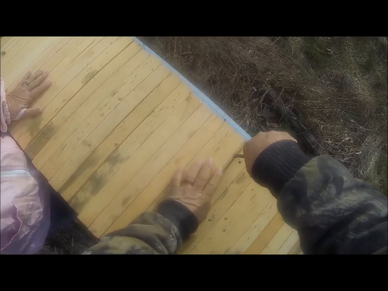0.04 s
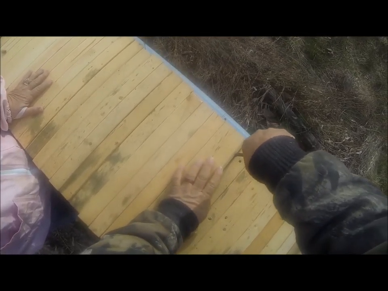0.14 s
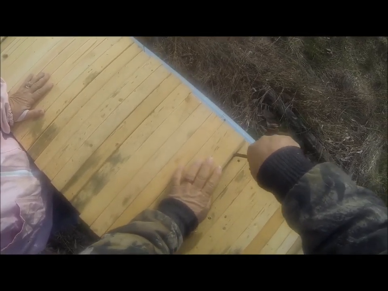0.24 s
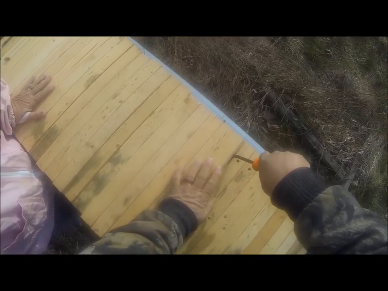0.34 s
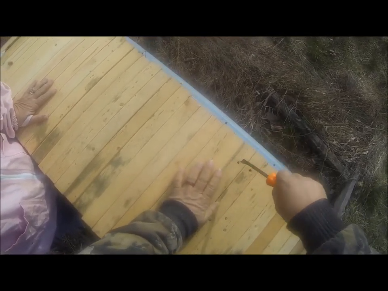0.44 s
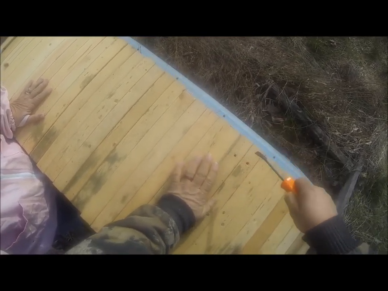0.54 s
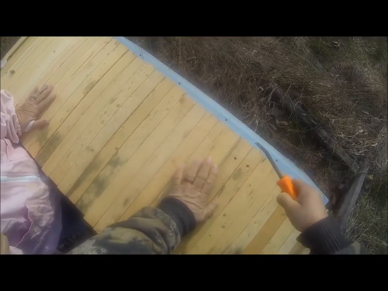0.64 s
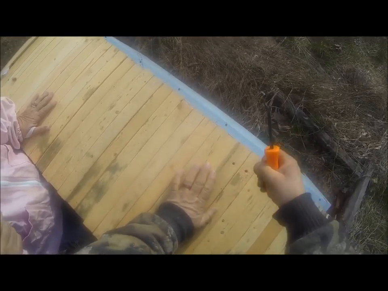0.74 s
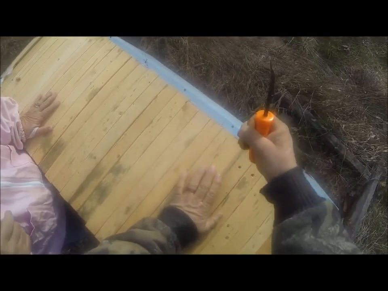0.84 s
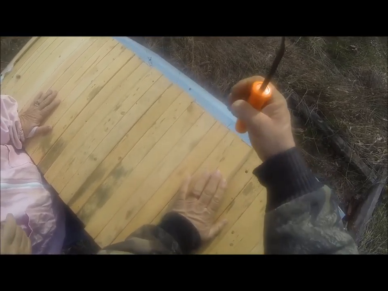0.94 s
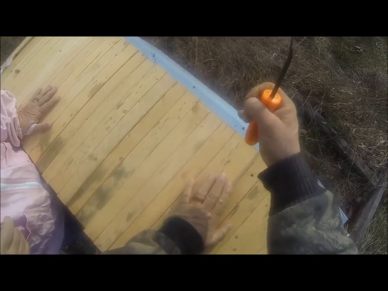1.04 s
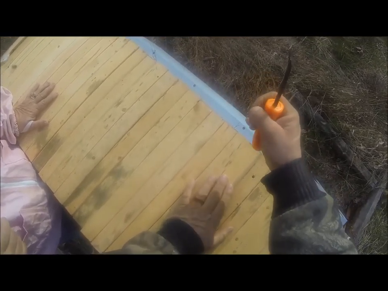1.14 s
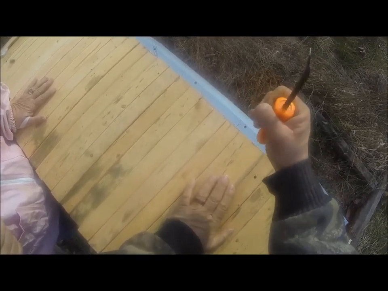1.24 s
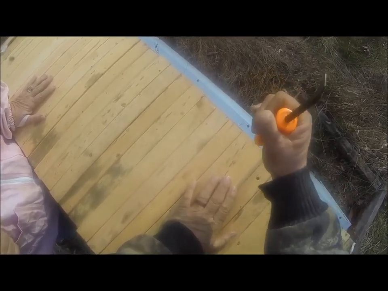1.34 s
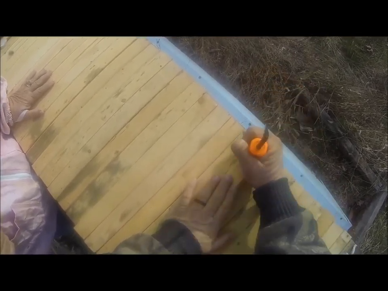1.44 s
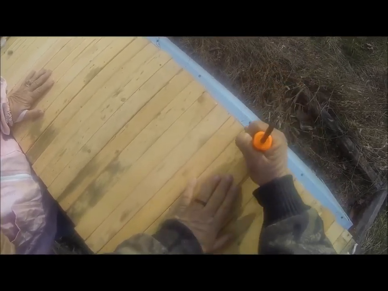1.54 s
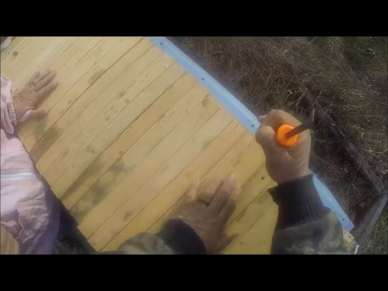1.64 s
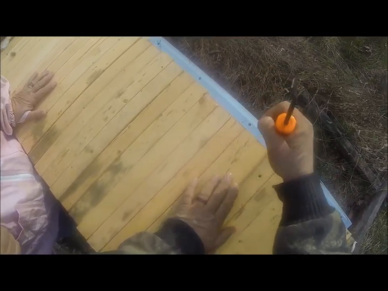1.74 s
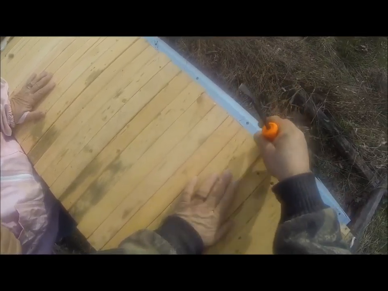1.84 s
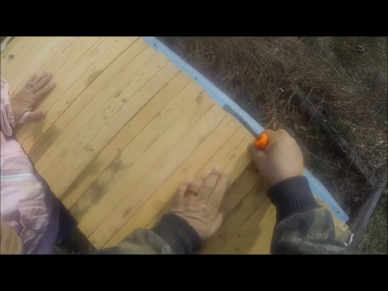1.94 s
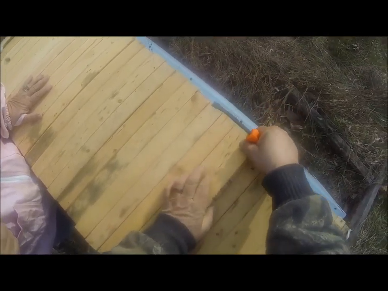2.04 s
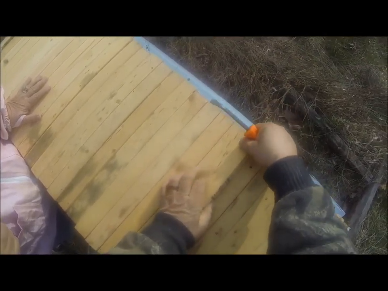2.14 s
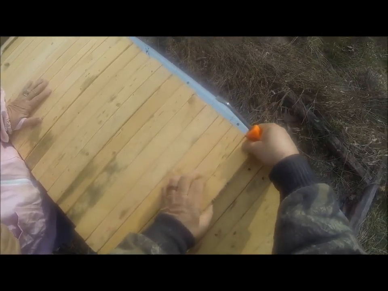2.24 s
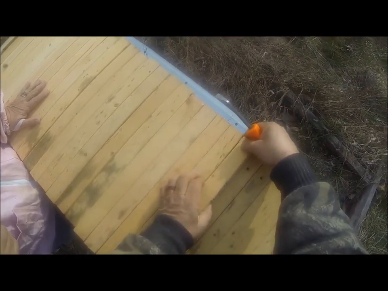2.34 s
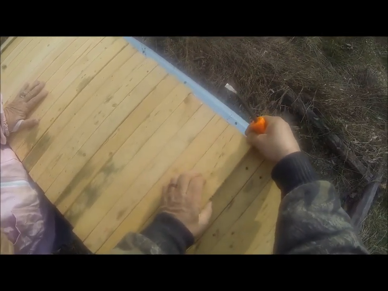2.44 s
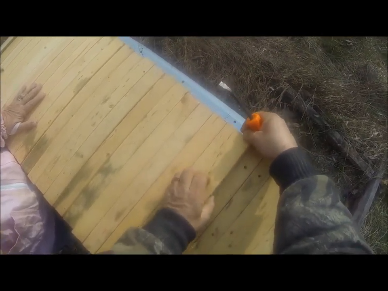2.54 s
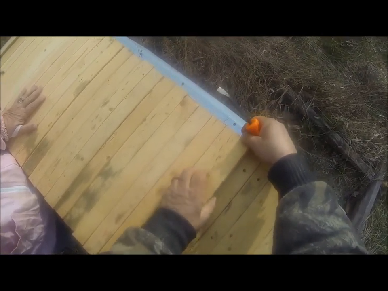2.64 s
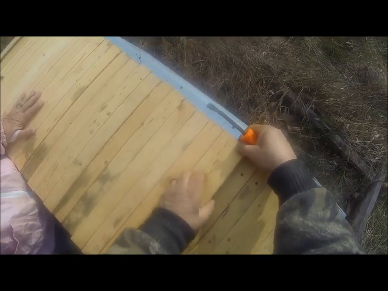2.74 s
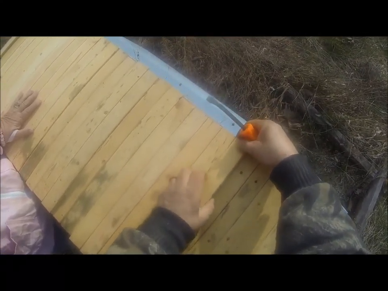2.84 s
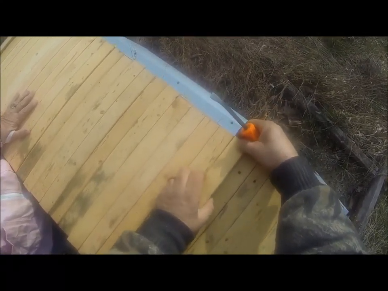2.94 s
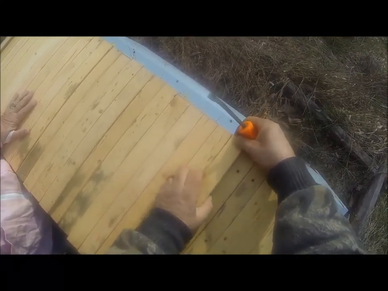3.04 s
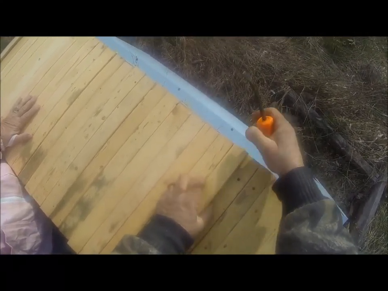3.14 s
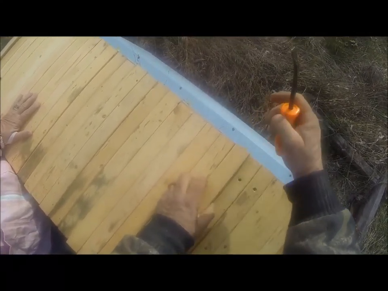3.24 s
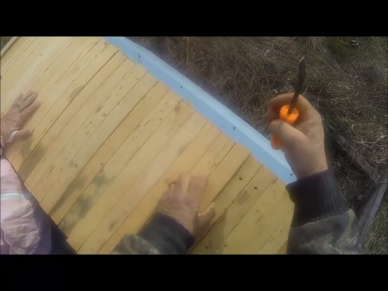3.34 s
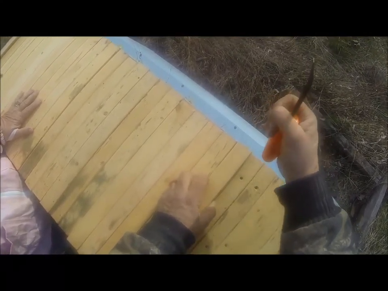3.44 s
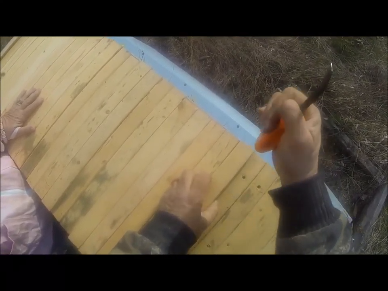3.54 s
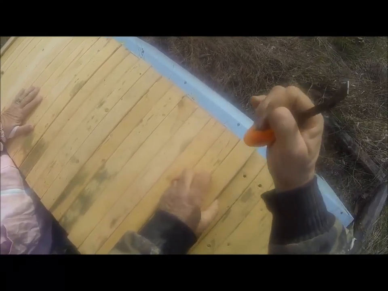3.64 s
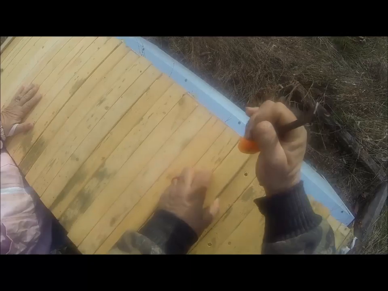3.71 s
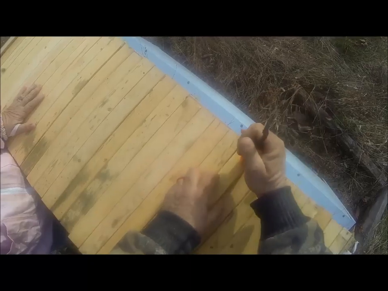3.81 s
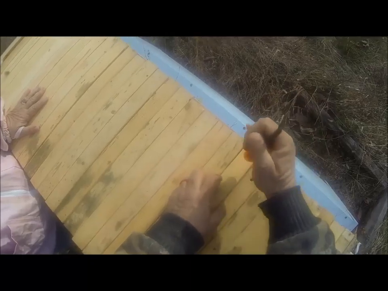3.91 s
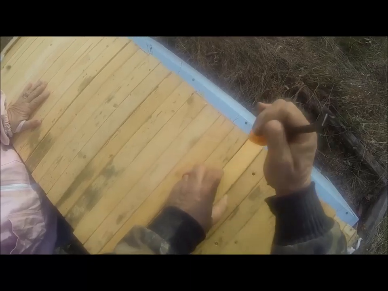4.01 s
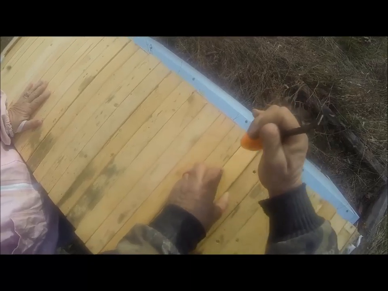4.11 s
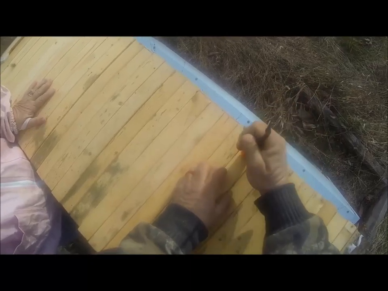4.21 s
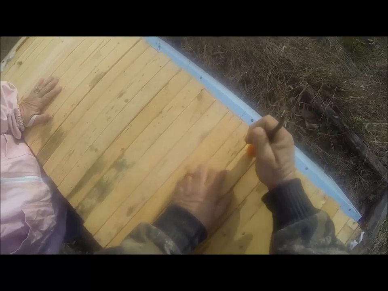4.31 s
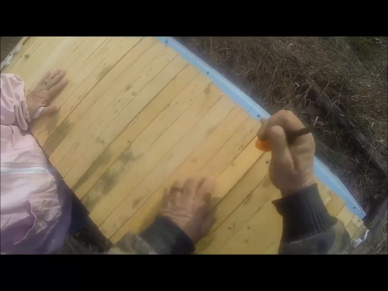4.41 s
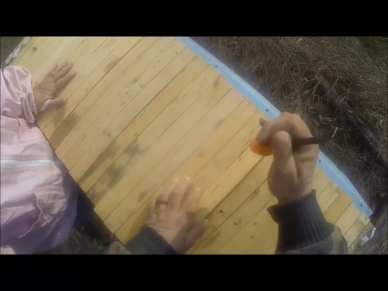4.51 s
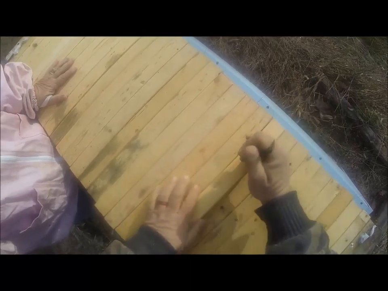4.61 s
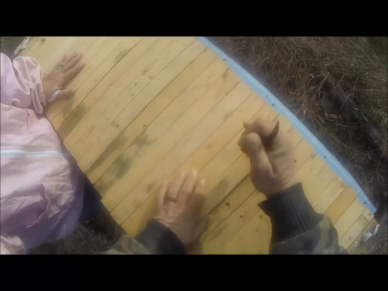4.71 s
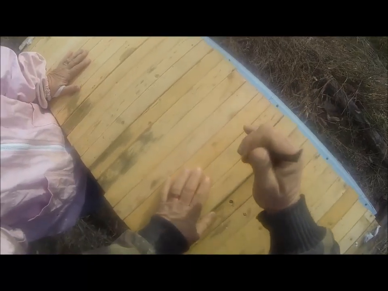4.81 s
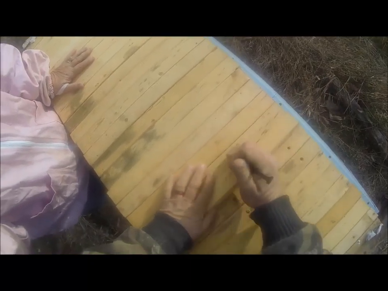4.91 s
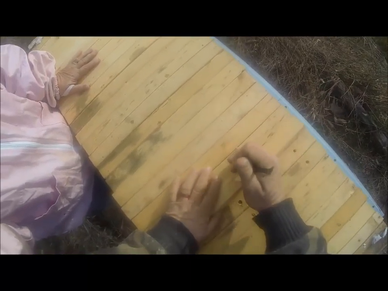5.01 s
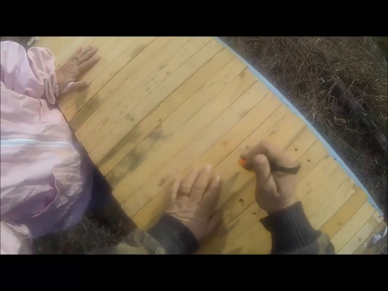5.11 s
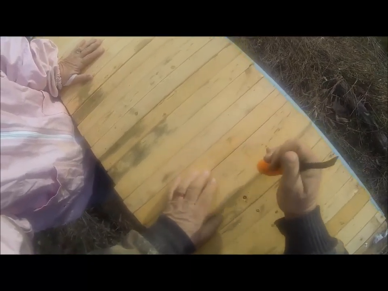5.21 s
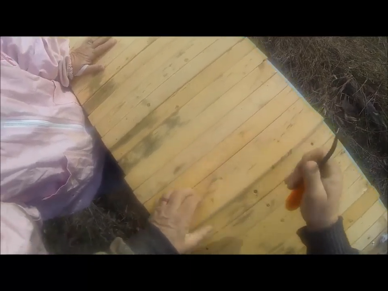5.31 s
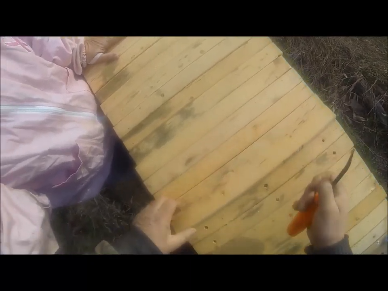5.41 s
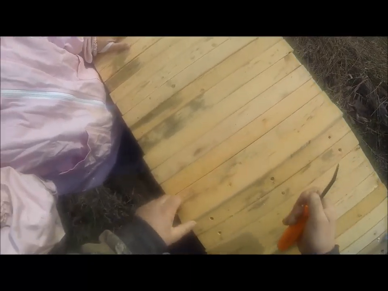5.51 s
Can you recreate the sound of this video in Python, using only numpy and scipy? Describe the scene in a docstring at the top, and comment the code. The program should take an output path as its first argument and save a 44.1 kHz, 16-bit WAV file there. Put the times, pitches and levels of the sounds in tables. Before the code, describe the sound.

Sparse loud woody clacks with sharp edge snaps, speeding up near the end, among small blade scrapes and soft hand bumps outdoors.

```python
"""Hand tool on a slatted deck

A hand tool is set into the gaps of wooden slats outdoors, close to a body-worn camera.
Hard blows sum a swelling clack, an edge snap and ringing modes of slat and deck; rebounds are heavier.
Between them filtered noise scrapes and ticks as the blade, and soft thuds bump and judder the wood.
A jacket rustles over quiet air, far hoots and a thin whine; a limiter ducks all after the loudest peaks."""
import sys
import numpy as np
from scipy import signal
from scipy.io import wavfile
from scipy.ndimage import uniform_filter1d, minimum_filter1d

SR = 44100
rng = np.random.default_rng(int(sys.argv[2]) if len(sys.argv) > 2 else 0)


def put_to_file(sound):
    """Save the sound as 16-bit audio at rate SR, in the file named by the first command-line argument."""
    columns = np.atleast_2d(sound).T  # one column per channel
    safe = np.clip(columns, -1, 1)
    whole_steps = np.round(safe * 32767)
    wavfile.write(sys.argv[1], SR, whole_steps.astype(np.int16))


N = 245195

# Colour of the outdoor air. Each row: frequency in Hz, relative density in dB per Hz.
AIR_COLOUR = [(20, -2.5), (50, 5), (105, -3.5), (130, -3), (165, -8.5), (280, -15), (700, -18), (1500, -26),
              (3800, -33.5), (7500, -34.5), (10200, -39), (12000, -39), (14000, -41.5), (15500, -54.5)]
# Faint far hoots. Each row: start and end in seconds, first and last pitch in Hz, level in dB.
FAR_HOOTS = [(0.696, 0.824, 799, 594, -61.5), (0.987, 1.082, 584, 648, -66),
             (1.273, 1.347, 570, 680, -65.5)]
# The jacket rustles as the arm works. Each row: start and end in seconds, level in dB.
ARM_MOVES = [(.6, 1.12, -75), (1.999, 3.301, -75), (3.813, 5.361, -62.5)]
# Colour of the cloth. Each row: frequency in Hz, relative density in dB per Hz.
CLOTH_COLOUR = [(60, -0.5), (200, 3), (450, -3.5), (900, -2), (1400, 0.5), (1900, -6), (2500, -14),
                (4000, -22), (8000, -24.5), (15000, -33.5)]
# Thin tones under everything. Each row: pitch in Hz, level in dB, waver in Hz, pulsing depth from 0 to 1.
WHINE_TONES = [(124, -68.5, 8, 0), (4940, -91, 70, .8), (5730, -89.5, 79, .9), (7692, -76.5, .3, 0.6),
               (7776, -86.5, 34, 0.8), (10300, -84, 90, .9)]
# Blade and palm sliding on wood. Each row: start and end in seconds, hiss level in dB,
# wood tone in dB against the hiss, relative judder level in dB.
SCRAPE_STROKES = [(.005, 0.043, -67.5, -4, -47.5), (0.434, .49, -63, 9, -28), (2.022, 2.065, -63, -1, -38),
                  (2.05, 2.42, -76, -18, -46), (2.472, 2.565, -63.5, -1, -38),
                  (2.689, 2.73, -77.5, 16, -44), (2.7, 3.3, -72.5, -2, -38), (4.164, 4.225, -69.5, 2, -41),
                  (4.359, 4.56, -63, 2.5, -48), (4.521, 4.68, -57, -5, -45.5),
                  (4.715, 4.785, -53.5, -3, -29.5)]
# The steel blade catching on an edge. Each row: start in seconds, relative level in dB.
BLADE_TICKS = [(.107, -43.5), (.4734, -37.5), (2.309, -41.5), (2.376, -40.5), (2.550, -34), (2.603, -42),
               (3.9946, -29.5), (4.182, -34.5), (4.6362, -32), (4.7051, -25.5), (4.754, -27.5)]
# Colour of the steel blade. Each row: frequency in Hz, relative density in dB per Hz.
STEEL_COLOUR = [(300, -6.5), (1500, 7), (2600, -2), (3400, -1), (4300, -8.5), (5100, 1.5), (6000, -7),
                (7200, 0.5), (8600, -0.5), (10000, -6), (12500, -14), (15500, -18.5)]
# Ring of the tool itself. Each row: mode in Hz, relative level in dB, t60 in seconds.
TOOL_MODES = [(1964, 5.5, 0.056), (2016, -13, 0.056), (3310, -6, 0.081), (3630, -22, 0.03),
              (4830, -11, 0.053), (6200, -7.5, 0.036), (7000, -6, .03), (8200, -9, 0.044),
              (8780, -2, 0.026)]
# Soft bumps of hand and handle. Each row: start in seconds, relative level in dB, brightness in Hz.
HAND_BUMPS = [(.108, -35, 1200), (.345, -34, 200), (0.474, -18.5, 690), (2.289, -24.5, 187),
              (2.309, -40, 800), (2.342, -31, 328), (2.480, -32.5, 500), (2.506, -22, 342),
              (2.5139, -28, 360), (2.549, -32.5, 1400), (2.569, -33, 1200), (2.76, -38.5, 296),
              (3.170, -26, 346), (3.979, -31.5, 400), (4.179, -32.5, 452), (4.752, -23, 320),
              (4.77, -18, 378)]
# Modes of a slat before tuning and damping. Each row: mode in Hz, relative level in dB, t60 in seconds.
SLAT_MODES = [(89, -21, 0.29), (157, -25.5, 0.12), (182.5, -23.5, 0.14), (215.7, -17.5, 0.13),
              (232, -14, 0.072), (330, -28.5, 0.06), (355, -17, 0.071), (387, -18.5, 0.01),
              (492, -16.5, 0.062), (550.4, -28.5, 0.092), (641.2, -23, .065), (687, -11.5, 0.01),
              (860, -16, 0.016), (1021, -17, 0.036), (1110, -26, 0.042), (1216, -17, 0.034),
              (1420.6, -13.5, .02), (1509, -22.5, 0.056), (1800, -31, 0.05), (1913, -17.5, 0.057),
              (2220, -15.5, 0.022), (2314, -22, 0.025), (2500, -38.5, 0.031), (3350, -36.5, .032),
              (3370, -38, 0.015), (3790, -38.5, .022)]
# Dense overtones of the whole deck. Each row: frequency in Hz, relative density in dB per Hz.
DECK_COLOUR = [(60, -17), (160, 13.5), (400, 1.5), (800, -5.5), (1400, -1.5), (2000, -6), (2700, -17.5),
               (4500, -34), (8000, -32.5), (15000, -55.5)]
# Their decay before damping. Each row: frequency in Hz, t60 in seconds.
DECK_DECAY = [(100, 0.084), (400, 0.1), (1500, 0.054), (3500, 0.03), (9000, 0.065)]
# Hard blows of the tool. Each row: start in seconds, force in dB, clack pitch in Hz,
# relative edge level in dB, place along the slat in metres, slat tuning factor.
TOOL_BLOWS = [(1.5077, 11.5, 1345, -6, 0.59, 0.96), (3.838, 11, 1027, -2.5, 0.84, .99),
              (4.2376, 13.5, 947, -5, 1.23, 0.98), (4.6687, 16.5, 1070, -6.5, .52, 1.01),
              (4.971, 12.5, 976, -16, 1.261, 1.01), (5.0036, 9.5, 1100, -23, 0.52, .92)]
# The slat last struck slaps back on its support. Each row: start in seconds, force in dB,
# clack pitch in Hz, relative edge level in dB, place along the slat in metres.
SLAT_REBOUNDS = [(1.5105, 4.5, 1110, -13.5, 0.74), (3.8463, -6, 1080, -10, 1.4), (3.856, 0, 800, -8, 0.6),
                 (4.2443, 3.5, 700, -9, 0.72), (4.3109, -16.5, 826, -33, 0.51),
                 (4.6729, 4.5, 2210, 2.5, 0.74), (4.9767, 4.5, 1435, 7.5, .8)]
# A blow is bright and leaves slat and blade free to ring; a rebound is heavy and damped.
# Each holds: cycles to the clack's peak, slat ring in dB, bass in dB, ring time factor,
# blade ring in dB against the edge snap.
BLOW_CONTACT = (0.76, 0.5, -8, 1.1253, -7.5)
REBOUND_CONTACT = (.65, 2, 10, 0.7142, -20.5)
# Colour of a wooden edge snapping under the blade. Each row: frequency in Hz, relative density in dB per Hz.
SNAP_COLOUR = [(300, -6.5), (1500, -2.5), (2400, 2.5), (3000, 1), (3900, 4), (4700, 0.5), (6000, -5.5),
               (7200, -1.5), (8600, -1.5), (10000, -13.5), (12500, -18), (15500, -33.5)]

AIR_DB = -59.5
MOVE_FADE_S, RESTING_DB = 0.15, -78
WEDGED_S = (1.95, 3.4)  # wedged in a gap, the blade rings as it scrapes; otherwise the fist damps it
JUDDER_HZ = 297.4  # brightness of the thuds as a sliding hand sticks and slips
EDGE_HZ = 15200  # upper band limit
RING_T = np.arange(SR // 4) / SR  # time axis of one ring, in seconds


def amp(db):
    """Turns decibels into gain."""
    return 10 ** (np.asarray(db) / 20)


def unit(x):
    """Scales to rms 1."""
    return x / np.sqrt(np.mean(x ** 2) + 1e-20)


def read(points, hz):
    """Reads a table on a log-frequency axis."""
    f, value = np.transpose(points)
    return np.interp(np.log(hz + 1), np.log(f), value)


def add(mix, s, sound):
    """Mixes a sound in at time s, in seconds."""
    part = mix[max(round(s * SR), 0):][:len(sound)]
    part += sound[:len(part)]


def colour(x, points):
    """Filters causally to the given spectrum, with unit power gain for white noise."""
    log_gain = np.log(amp(read(points, np.fft.rfftfreq(4096, 1 / SR))))
    circle = np.r_[log_gain, log_gain[-2:0:-1]]
    # minimum phase: the response starts at once
    response = np.fft.ifft(np.exp(np.conj(signal.hilbert(circle)))).real
    taps = response[:len(circle) // 2]
    return signal.oaconvolve(x, taps / np.linalg.norm(taps))[:len(x)]


def drift(length, per_s):
    """Wanders at random by straight lines between normal random points, per_s of them a second."""
    knots = rng.standard_normal(int(length / SR * per_s) + 2)
    return np.interp(np.arange(length) / SR * per_s, np.arange(len(knots)), knots)


def decay(t, t60):
    """Exponential decay by 60 dB in t60 seconds."""
    return np.exp(-np.log(1000) * t / t60)


def outdoors(swell_db=-0.37, waver=0.08):
    """Air is slowly swelling noise, low rumble and hiss; far hoots are gliding tones blurred by waver."""
    level_db = AIR_DB + swell_db * drift(N, per_s=4.6)
    out = amp(level_db) * colour(rng.standard_normal(N), AIR_COLOUR)
    for start, end, first_hz, last_hz, db in FAR_HOOTS:
        length = max(round((end - start) * SR), 2)
        glide_hz = np.linspace(first_hz, last_hz, length)
        hz = glide_hz * (1 + waver * drift(length, per_s=530))
        tone = np.sin(2 * np.pi * np.cumsum(hz) / SR)
        add(out, start, amp(db) * signal.windows.tukey(length, .6) * tone)
    return out


def jacket(flutter_db=1.5):
    """Cloth rubs unevenly, swelling and fading with each arm move over a faint resting rustle."""
    t = np.arange(N) / SR
    rub = np.full(N, amp(RESTING_DB))
    for start, end, db in ARM_MOVES:
        fade = np.clip(np.minimum(t - start, end - t) / MOVE_FADE_S, 0, 1)
        rub += amp(db) * fade
    flutter = amp(flutter_db * drift(N, per_s=21))
    return rub * flutter * colour(rng.standard_normal(N), CLOTH_COLOUR)


def whine(gap_share=0.26, frames_per_s=30):
    """A low hum stays steady; thin high tones dip briefly with every frame that the camera takes."""
    gaps = (np.arange(N) * frames_per_s / SR) % 1 < gap_share
    gaps = uniform_filter1d(gaps.astype(float), size=100)
    out = np.zeros(N)
    for hz, db, waver_hz, depth in WHINE_TONES:
        pitch_hz = hz + waver_hz * drift(N, per_s=750)
        tone = np.sin(2 * np.pi * np.cumsum(pitch_hz) / SR)
        out += amp(db) * (1 - depth * gaps) * tone
    return out


def blade(tick_db=-8, tick_wood_db=-2, grain_db=4, slips_per_s=700, ring_db=-5):
    """Single ticks and strokes of tiny slips hiss in the steel, murmur in the wood and ring a wedged blade."""
    steel, wood = np.zeros(N), np.zeros(N)
    for s, db in BLADE_TICKS:
        catch = amp(db + tick_db) * burst(t60=0.0078)
        add(steel, s, catch)
        add(wood, s, amp(tick_wood_db) * catch)
    for start, end, db, wood_db, _ in SCRAPE_STROKES:
        length = max(round((end - start) * SR), 2)
        grain = amp(grain_db * drift(length, slips_per_s))
        slips = unit(rng.standard_normal(length) * grain)
        stroke = amp(db) * slips * signal.windows.tukey(length, .5)
        add(steel, start, stroke)
        add(wood, start, amp(wood_db) * stroke)
    t = np.arange(N) / SR
    wedged = (t > WEDGED_S[0]) & (t < WEDGED_S[1])
    # the harder it bears on the wood, the more the blade rings
    ringing = signal.oaconvolve(wood * wedged, tool_ring())[:N]
    return colour(steel, STEEL_COLOUR) + colour(wood, DECK_COLOUR) + amp(ring_db) * ringing


def burst(t60):
    """A brief crackle of random signs where steel meets a wooden edge."""
    return rng.choice([-1., 1.], len(RING_T)) * decay(RING_T, t60)


def tool_ring():
    """The steel blade's modes as decaying sines, of unit energy together."""
    hz, db, t60 = np.transpose(TOOL_MODES)[:, :, None]
    ring = (amp(db) * decay(RING_T, t60) * np.sin(2 * np.pi * hz * RING_T)).sum(0)
    return ring / np.linalg.norm(ring)


def bumps():
    """Hand and handle make single thuds, and a run of small ones under every scrape."""
    out = np.zeros(N)
    for s, db, bright_hz in HAND_BUMPS:
        add(out, s, amp(db) * thud(bright_hz))
    for start, end, _, _, db in SCRAPE_STROKES:
        run = signal.fftconvolve(judder(end - start), thud(JUDDER_HZ))
        add(out, start, amp(db) * run)
    return radiate(out, corner_hz=132.1)


def judder(seconds, count=6, spread_db=2.5, edge_db=-5):
    """Any stroke slips the same few times, on average hardest in the middle: one push for each slip."""
    length = max(round(seconds * SR), 2)
    phase = (np.arange(count) + rng.uniform(.1, .9, count)) / count
    push_db = spread_db * rng.standard_normal(count) + edge_db * (2 * phase - 1) ** 2
    slips = np.zeros(length)
    slips[(phase * length).astype(int)] = amp(push_db)
    return slips


def thud(bright_hz, ring=0.98, place=0.68, modes_db=3, deck_db=-5, dull_db=14, skin_hz=2000):
    """A soft, slow contact favours the low modes; the padding of the skin takes the treble away."""
    def weight_db(hz):
        slow_contact = 1 + (hz / bright_hz) ** 2
        padding = 1 + (hz / skin_hz) ** 4
        return -dull_db * np.log10(slow_contact * padding)

    modes = slat(place * rng.uniform(0.81, 0.84), ring, weight_db, tuning=1.02)
    return amp(modes_db) * modes + amp(deck_db) * deck(ring, weight_db)


def slat(place, ring, weight_db, tuning, node_depth=0.69, travel=0.00092):
    """Modes are weighted by their shape at the struck place; low bending waves arrive last."""
    hz, db, t60 = np.transpose(SLAT_MODES)[:, :, None]
    hz = hz * tuning
    wavenumber = np.sqrt(hz / 1000)  # relative to 1 kHz: bending waves follow a square root
    shape = 1 + node_depth * np.cos(2 * np.pi * place * 2 * wavenumber)
    t = np.maximum(RING_T - travel / wavenumber, 0)
    level = shape * amp(db + weight_db(hz))
    return (level * decay(t, t60 * ring) * np.sin(2 * np.pi * hz * t)).sum(0)


def deck(ring, weight_db, rise=0.0011):
    """Countless weak modes of the neighbouring boards: a noisy tail with its own decay in each band."""
    hz, t, bands = signal.stft(rng.choice([-1., 1.], len(RING_T)), SR, nperseg=256)
    t60 = ring * read(DECK_DECAY, hz)[:, None]
    bands = bands * amp(weight_db(hz))[:, None] * decay(t, t60)
    tail = signal.istft(bands, SR, nperseg=256)[1][:len(RING_T)]
    return colour(tail * (1 - np.exp(-RING_T / rise)), DECK_COLOUR)


def radiate(x, corner_hz):
    """Open slats radiate little deep bass."""
    return signal.sosfilt(signal.butter(4, corner_hz, "high", fs=SR, output="sos"), x)


def knocks():
    """Every blow strikes a slat; each rebound keeps the tuning of the slat last struck."""
    out = np.zeros(N)
    for s, *hit in TOOL_BLOWS:
        add(out, s, knock(*hit, BLOW_CONTACT))
    for s, *hit in SLAT_REBOUNDS:
        tuning = [blow[-1] for blow in TOOL_BLOWS if blow[0] < s][-1]
        add(out, s, knock(*hit, tuning, REBOUND_CONTACT))
    return radiate(out, corner_hz=116.95)


def knock(db, pitch_hz, edge_db, place, tuning, touch, clack_db=-6, modes_db=-5, deck_db=-25.0,
          snap_db=-30, bass_hz=420, grip_hz=2100):
    """A clack swells and dies in a few cycles; an edge snap and gripped blade join the slat and deck ring."""
    cycles, ring_db, bass_db, ring, blade_db = touch

    def weight_db(hz):
        return ring_db + bass_db / (1 + (hz / bass_hz) ** 2)

    u = RING_T * pitch_hz / cycles  # the swell peaks at u = 1
    swell = (u * np.exp(1 - u)) ** 2.9
    clack = -swell * np.sin(2 * np.pi * pitch_hz * RING_T)
    modes = slat(place, ring, weight_db, tuning)
    wood = amp(modes_db) * modes + amp(deck_db) * deck(ring, weight_db)
    # the grip dulls the blade's ring
    steel = signal.sosfilt(signal.butter(4, grip_hz, fs=SR, output="sos"), tool_ring())
    snap = colour(burst(t60=.028), SNAP_COLOUR)
    edge = amp(snap_db) * snap + amp(blade_db) * steel
    return amp(db) * (amp(clack_db) * clack + wood + amp(edge_db) * edge)


def yard(x, echo_db=-37, t60=0.11):
    """Grass and nearby things scatter a faint, short echo, after a gap of 12 ms."""
    echo = rng.standard_normal(len(RING_T)) * decay(RING_T, t60) * (RING_T > .012)
    return x + amp(echo_db) * signal.oaconvolve(x, echo / np.linalg.norm(echo))[:N]


def scene():
    """Sums everything that reaches the microphone; only tool and deck sounds get the echo."""
    return (yard(knocks() + bumps() + blade()) + jacket() + outdoors())[None]


def record(dry, ceiling_db=-6, recover_db_per_s=18):
    """Electronics add the whine; a limiter drops at once on peaks and recovers slowly; then the band limit."""
    t = np.arange(N) / SR
    x = dry[0] + whine()
    over_db = np.maximum(20 * np.log10(abs(x) + 1e-9) - ceiling_db, 0)
    # hold the highest overshoot, released along a straight slope in dB
    held_db = np.maximum.accumulate(over_db + recover_db_per_s * t) - recover_db_per_s * t
    gain_db = uniform_filter1d(minimum_filter1d(-held_db, size=24), size=24)
    low_pass = signal.firwin(255, EDGE_HZ, window=("kaiser", 9), fs=SR)
    return signal.oaconvolve(x * amp(gain_db), low_pass, "same")[None]


dry = scene()
out = record(dry)
put_to_file(out)
```